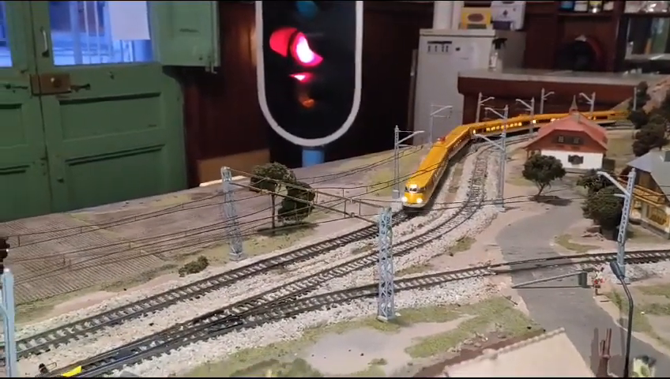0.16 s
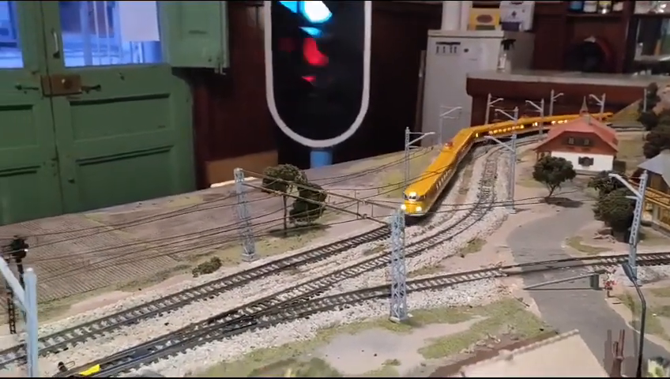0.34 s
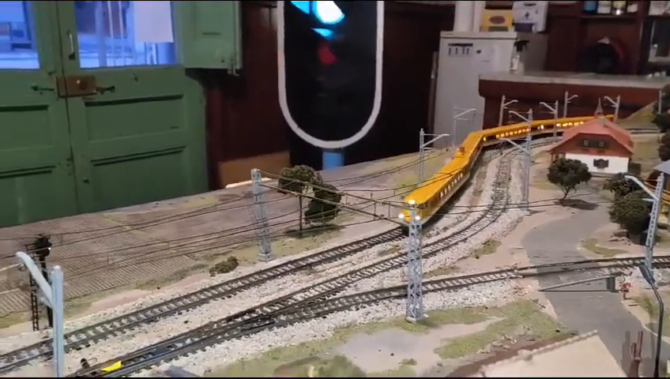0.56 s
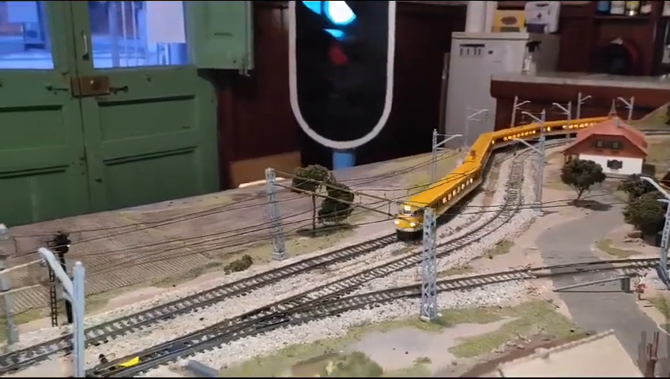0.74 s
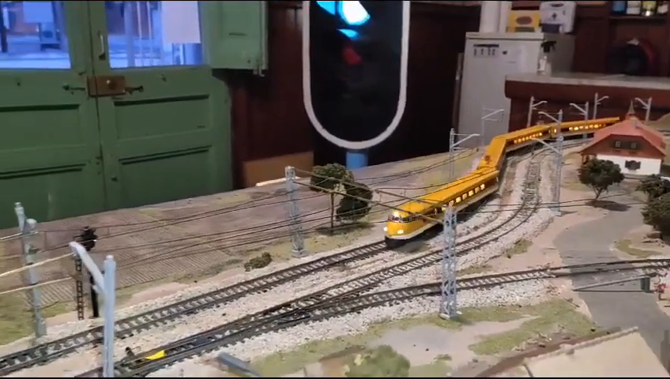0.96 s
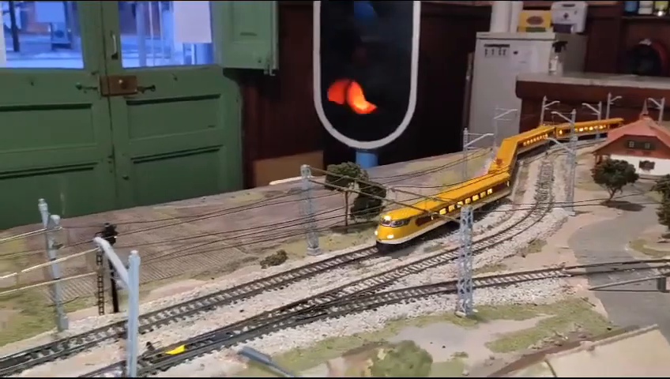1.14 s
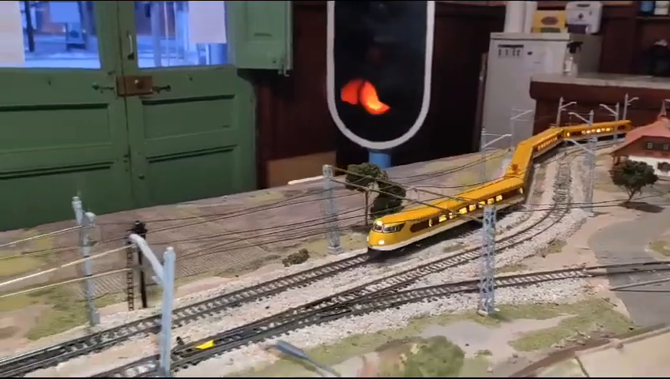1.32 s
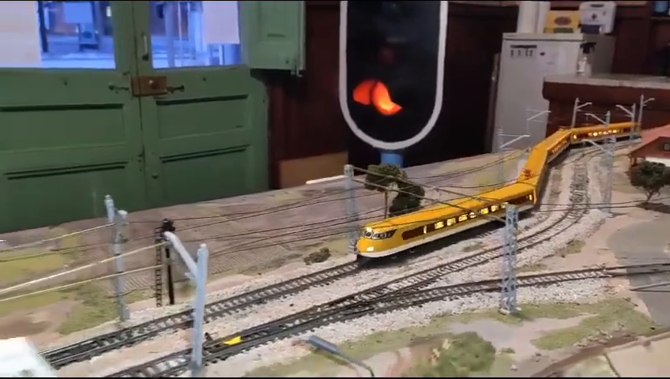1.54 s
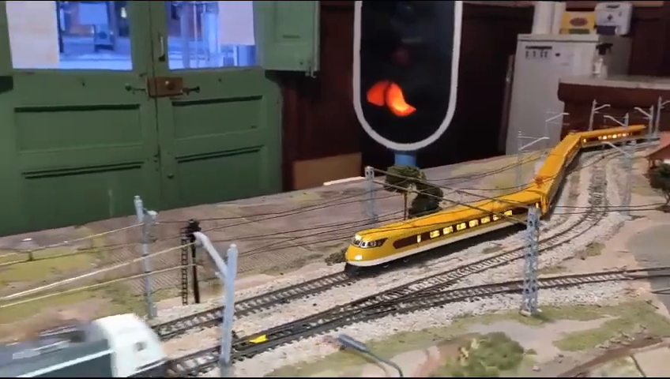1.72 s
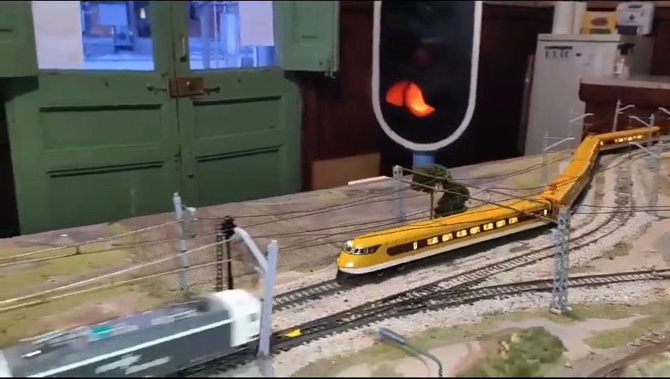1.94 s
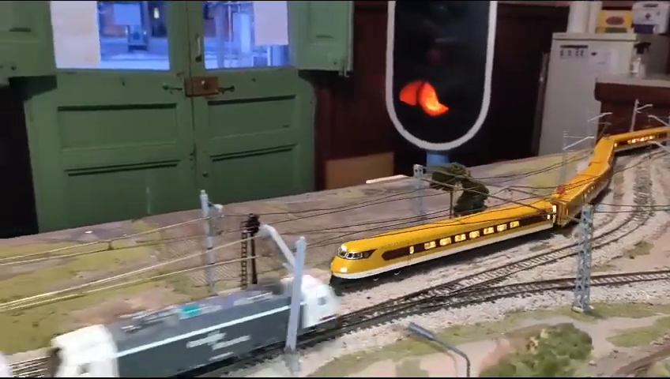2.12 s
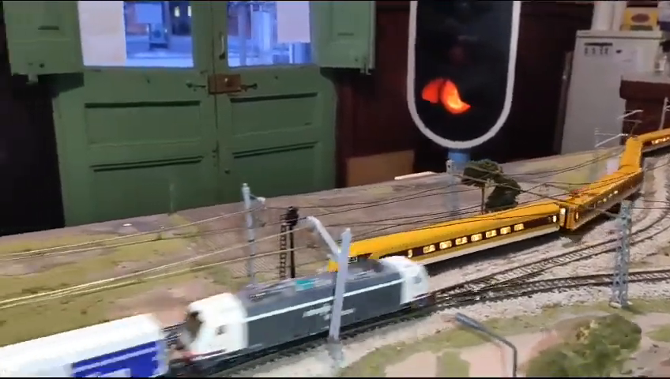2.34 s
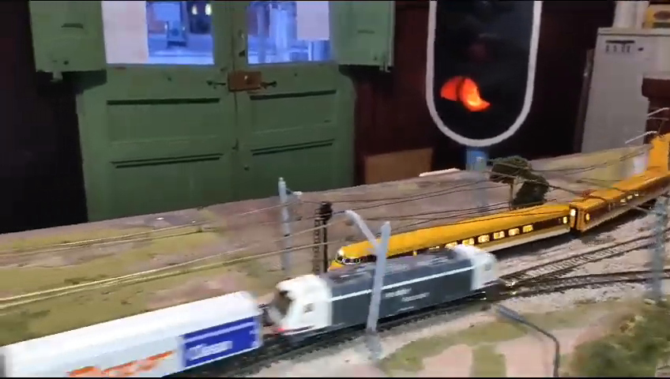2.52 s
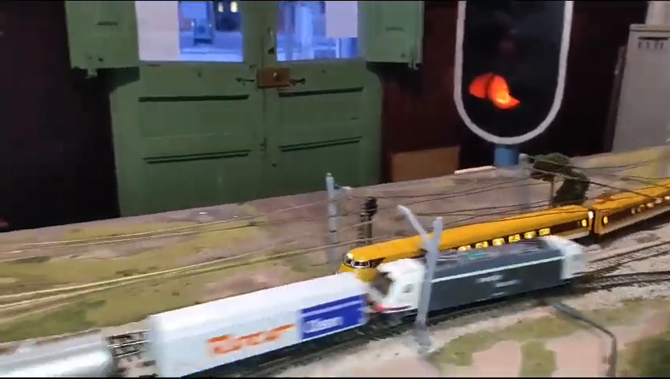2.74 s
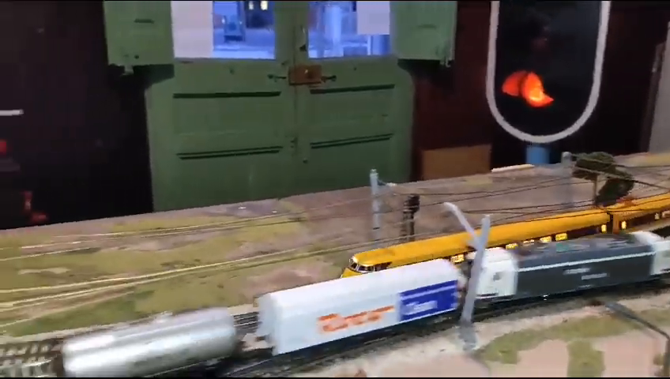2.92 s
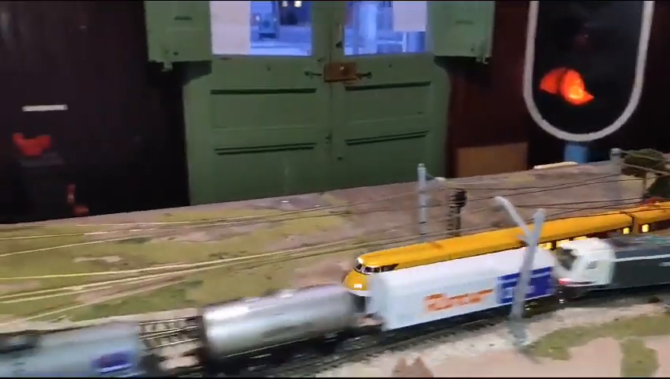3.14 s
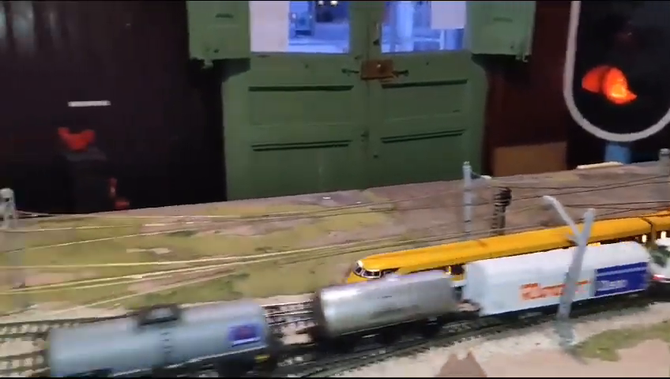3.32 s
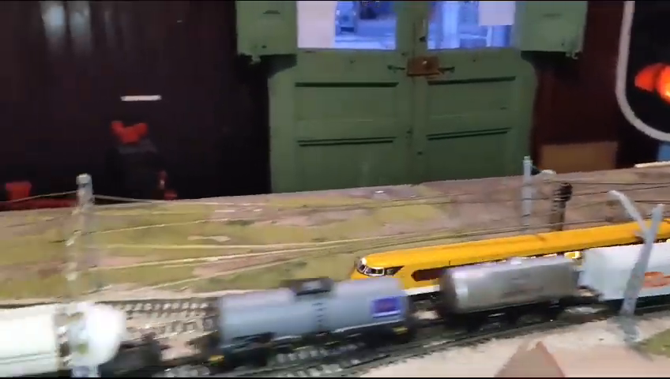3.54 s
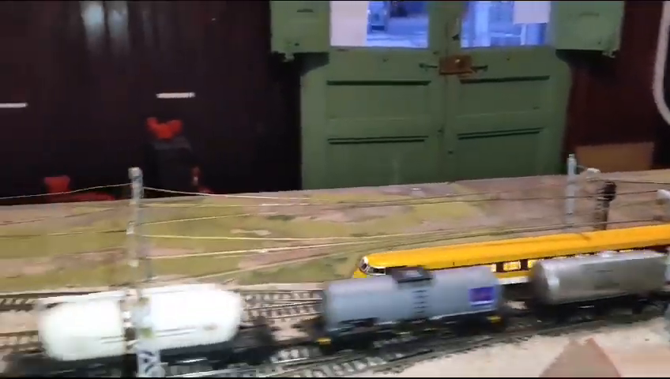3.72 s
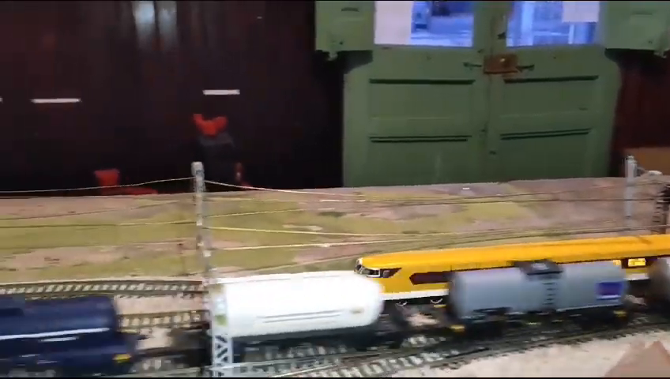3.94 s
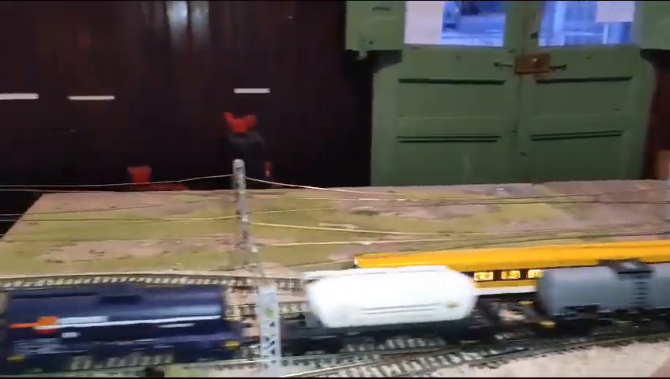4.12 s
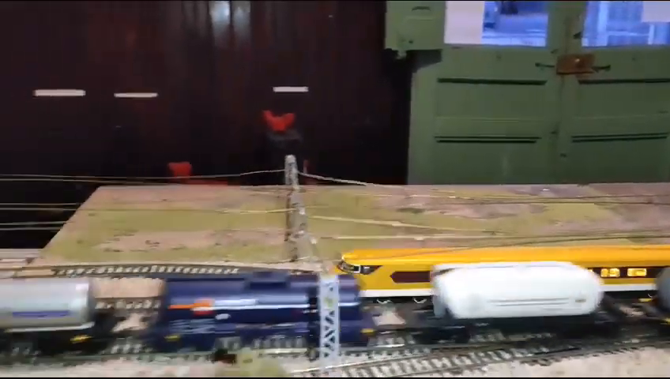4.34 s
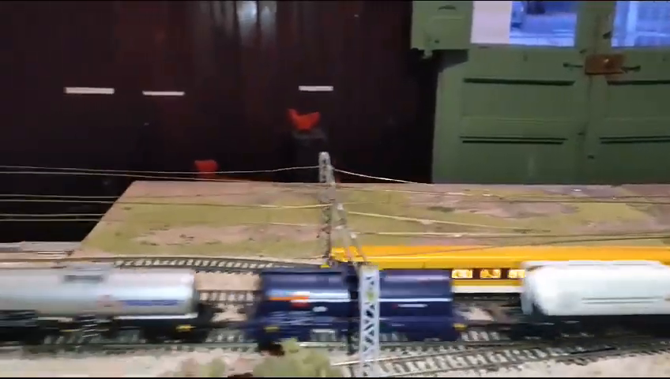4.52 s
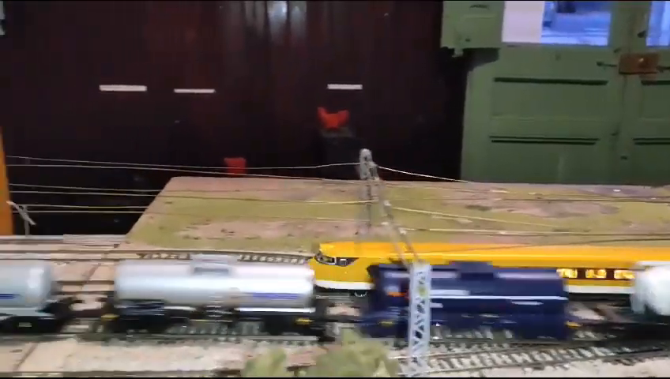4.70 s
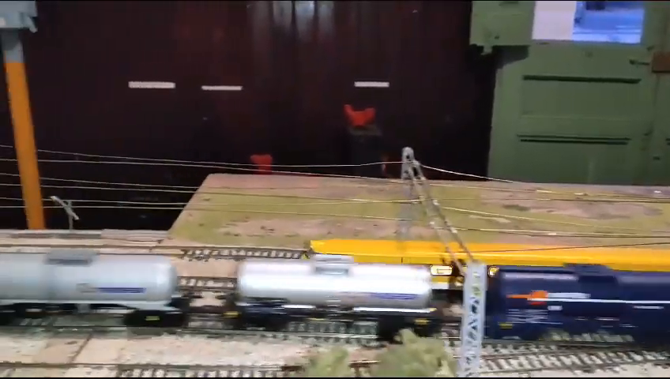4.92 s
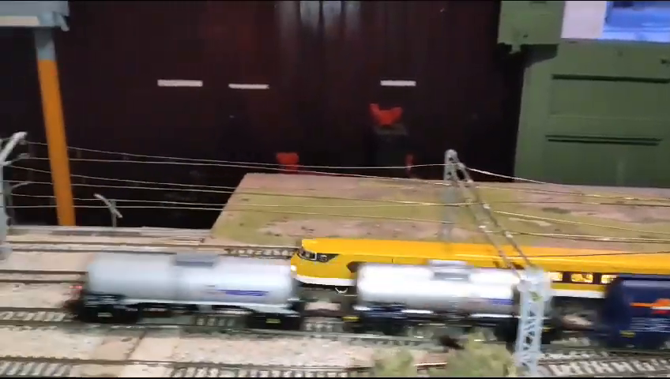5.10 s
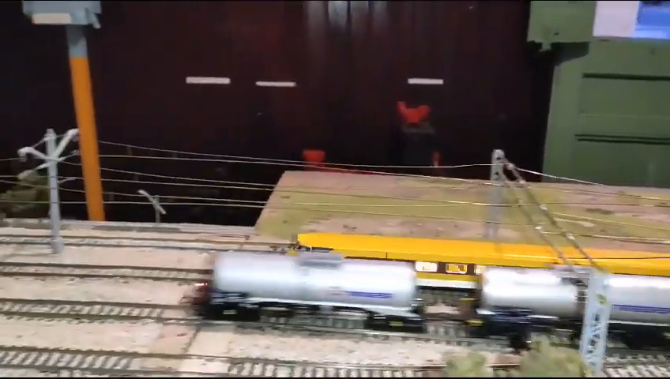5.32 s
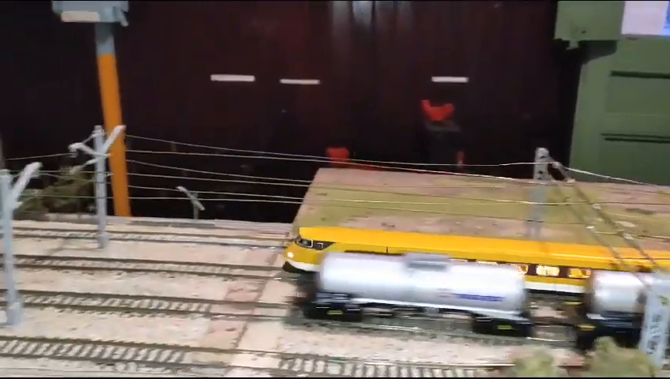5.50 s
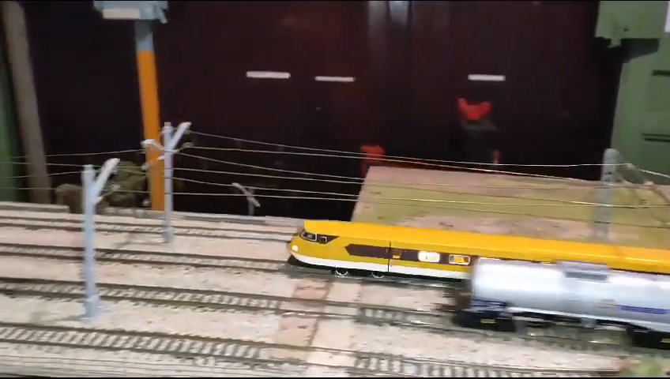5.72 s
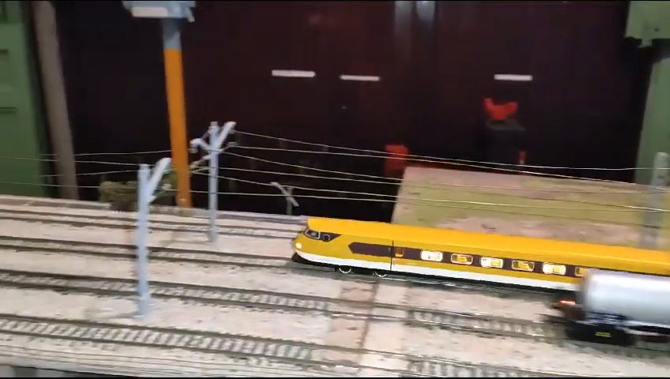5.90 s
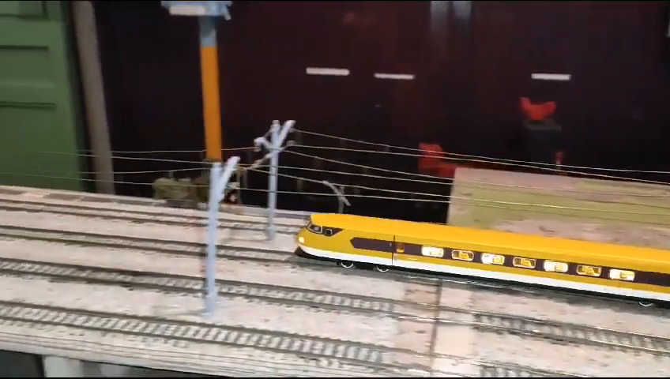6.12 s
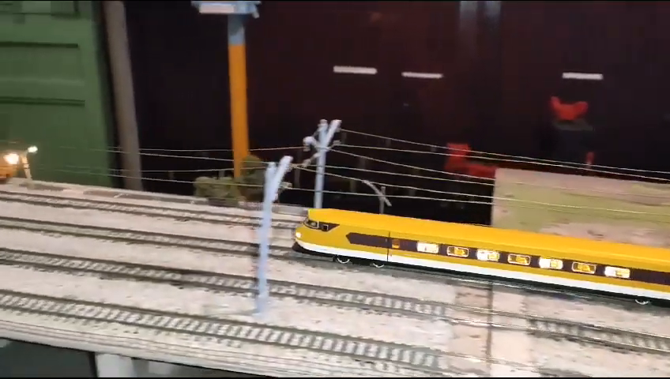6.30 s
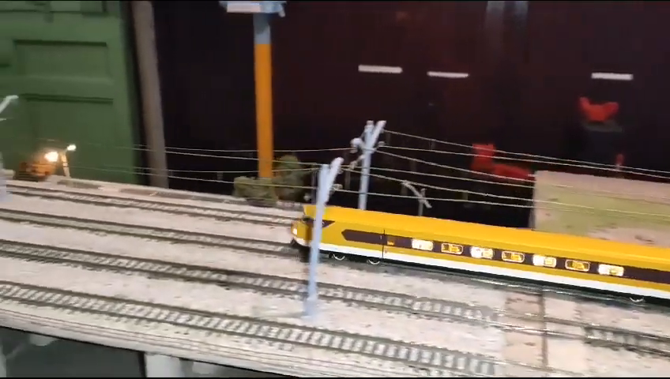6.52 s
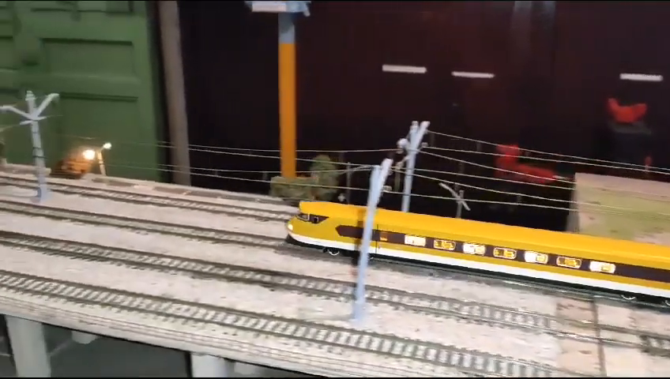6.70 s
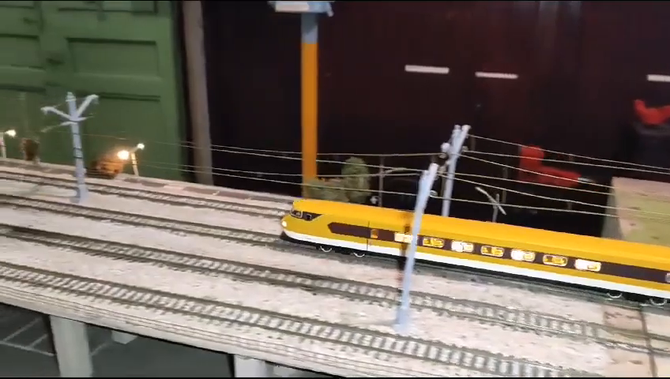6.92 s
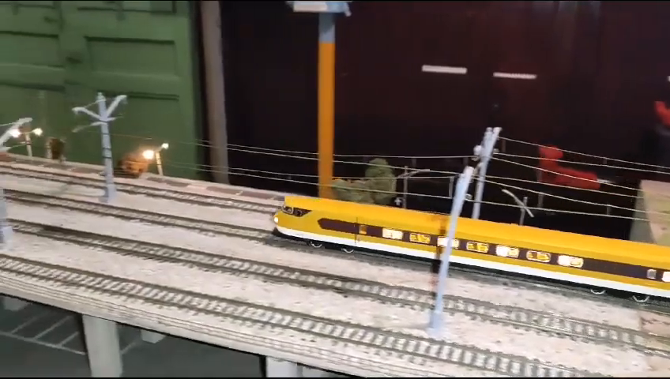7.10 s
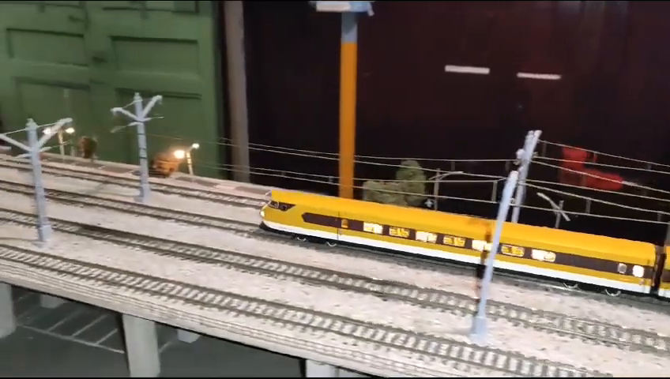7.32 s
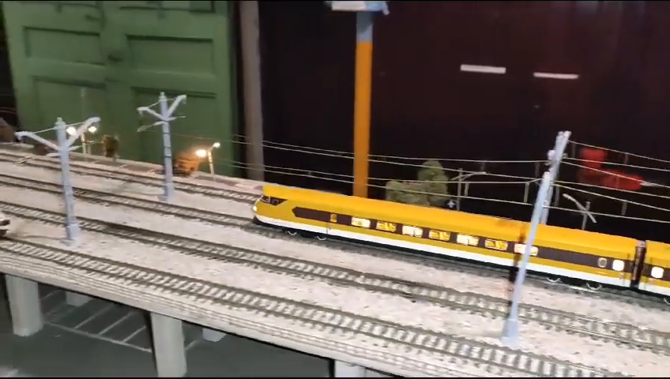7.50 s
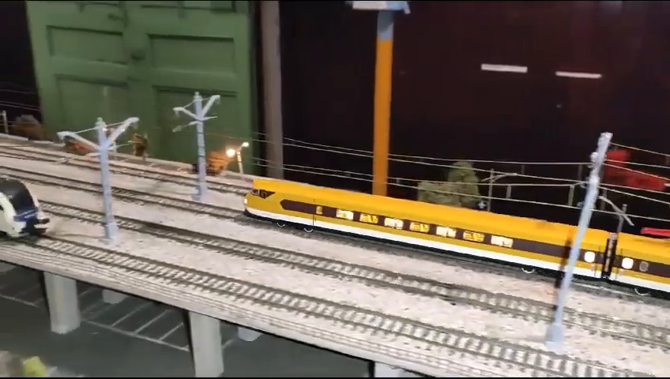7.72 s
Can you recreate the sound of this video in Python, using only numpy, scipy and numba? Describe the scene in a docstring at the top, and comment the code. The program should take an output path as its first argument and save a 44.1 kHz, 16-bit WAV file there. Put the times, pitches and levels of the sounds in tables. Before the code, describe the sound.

Two model electric trains pass on a wooden layout, heard close through a phone. Gear buzz and a dull distant drone come first, with small rail-joint clicks. Then the nearer goods train builds to a dense, bright metallic rattle with crisp clacks, tiny pings and a low tabletop rumble. After its last wagon the level falls sharply, leaving the railcar rolling on in the slightly echoing hall.

```python
"""A model railway club layout in a hall, heard close up from its edge through a phone microphone.
At first a railcar rolls steadily, gears buzz, and a goods train drones dully on the far side of the layout.
The goods train swells, its locomotive hums past at 3.5 s and its wagons clack over the points close by.
After 6 s its tail is soon gone and the railcar is left. Rough wheel treads make the roar, rattle and ring;
blows at joints make the clicks; the baseboard booms below, and shaft and gears supply the tones."""
import sys
import numpy as np
from scipy import signal
from scipy.fft import rfft, irfft
from scipy.io import wavfile
from numba import njit

SR = 44100
rng = np.random.default_rng(int(sys.argv[2]) if len(sys.argv) > 2 else 0)


def pcm_store(signal):
    """Save signal as 16-bit PCM."""
    levels = np.round(np.clip(np.atleast_2d(signal), -1, 1) * 32767)
    wavfile.write(sys.argv[1], SR, levels.astype(np.int16).T)


N = 341775  # 7.75 s
TIME = np.arange(N) / SR

# Colours of the plastic bodies, the rattling bogies and the ringing wheels: pitch_hz, level_db (per Hz)
ROAR_COLOUR = [(150, -22), (300, -10), (450, -13), (620, -9.5), (800, -8), (1050, -5), (1700, 0),
               (2000, -2), (2400, -2), (2800, -7), (3600, -11), (6000, -30), (16000, -74.5)]
RATTLE_COLOUR = [(1200, -30.5), (2400, -6.5), (3000, 1.5), (3900, 4), (5000, 2), (6200, -5), (7600, -7),
                 (9000, -5), (11000, -49), (16000, -73)]
RING_COLOUR = [(4000, -31.5), (7000, -2), (8500, 3.5), (9200, 4.5), (9850, 8), (10400, 1), (11200, -5),
               (12000, -19), (13000, -45.5)]
# Ringing pitch of the nearest wagon's shell, used as far as the goods train is close: start_s, pitch_hz
WAGON_SHELL_PITCH = [(2.0, 1850), (3.0, 1780), (3.9, 1650), (4.7, 1594), (5.3, 1820), (5.8, 2130)]
RAILCAR_SHELL_HZ, RAILCAR_HOLLOW_HZ = 1650, 787
SHELL_NEAR_DB, SHELL_FAR_DB = -2.5, -11.5  # over the roar, goods train abreast and away
HOLLOW_DB = -55.5  # the railcar's hollow body, before the roar is rescaled
HOLLOW_HELD_DB = -6  # added to it until the goods train has gone by


def rolling(roar_db, rattle_db, ring_db):
    """Tread roughness shakes the bodies, rattles the bogies and rings the wheels; the load on them wavers."""
    load = walk(24)
    near = closeness()
    shell_hz = RAILCAR_SHELL_HZ + (curves(WAGON_SHELL_PITCH)[0] - RAILCAR_SHELL_HZ) * near
    shell_db = SHELL_FAR_DB + (SHELL_NEAR_DB - SHELL_FAR_DB) * near ** 4
    hollow_db = HOLLOW_DB - roar_db + HOLLOW_HELD_DB * abreast(0, 0)

    # ticks stand out of the hiss only when the wheels are close
    ticks = specks(rate=110, spread_db=10.5) * unit(undb(0.58 * rattle_db))
    force = bumps(rate=5000, spread_db=2.5) + 0.5 * ticks
    shell = unit(resonate(bumps(rate=600, spread_db=1.0), shell_hz, 270.0))
    hollow_hz = np.full(N, float(RAILCAR_HOLLOW_HZ))
    hollow = unit(resonate(bumps(rate=2500, spread_db=2.0), hollow_hz, 145.0))
    bodies = unit(colour(force, ROAR_COLOUR)) + undb(shell_db) * shell + undb(hollow_db) * hollow
    roar = unit(bodies) * undb(roar_db + 0.5 + 0.44 * load + 0.74 * walk(130))

    hiss = rng.standard_normal(N)
    rattle = unit(colour(0.85 * ticks + hiss, RATTLE_COLOUR)) * undb(rattle_db - 1.93 + 0.45 * load)
    scrape = rng.standard_normal(N) * undb(0.59 * walk(170))
    ring = unit(colour(0.96 * ticks + scrape, RING_COLOUR)) * undb(ring_db - 1.2 + 0.95 * load)
    return roar + rattle + ring


def bumps(rate, spread_db):
    """Tiny impacts of rough treads on the rail: mostly weak, a few stronger; rate is per second."""
    hit = rng.random(N) < rate / SR
    strength = np.minimum(rng.exponential(size=N), 3.8)
    sign = np.sign(rng.standard_normal(N))
    return unit(hit * sign * undb(spread_db * strength))


def specks(rate, spread_db):
    """Grit and small flaws under the many wheels: each tick scrapes for a moment and rings at its own pitch."""
    out, size = np.zeros(N), 512
    t = np.arange(size) / SR
    for when, strength, pitch, length in rng.random((int(rate * N / SR), 4)):
        scrape = rng.standard_normal(size) * np.exp(-t / (0.0011 + 0.0043 * length))
        ring = resonate(scrape, np.full(size, 2500 + 8300 * pitch), 620.0)
        tick = unit(scrape) + 0.5 * unit(ring)
        add(out, when * N / SR, tick * undb(spread_db * strength ** 2))
    return unit(out)


# Rolling parts before trims and brief changes:
# railcar_db, goods_abreast_db, reached_s, rise_db_per_s (until then)
ROAR_PASS = (-47, -41.5, 2.5, 1.5)
RATTLE_PASS = (-50.5, -43, 4, 4)
RING_PASS = (-55.5, -49.5, 2.5, 6.5)
RUMBLE_PASS = (-59, -52, 3, 4.5)
LAST_WAGON_S, LEAVE_DB_PER_S = 5.99, 27.5


def abreast(reached_s, rise_db_per_s):
    """Gain of the goods train: it swells, holds while the wagons pass, and drops behind the last one."""
    rise_db = -rise_db_per_s * np.maximum(reached_s - TIME, 0)
    leave_db = -LEAVE_DB_PER_S * np.maximum(TIME - LAST_WAGON_S, 0)
    return undb(rise_db + leave_db)


def closeness():
    """How close the goods train is, from 0 to 1, following the rise and fall of its roar."""
    return abreast(*ROAR_PASS[2:])


def both_trains(railcar_db, goods_db, reached_s, rise_db_per_s):
    """Level in dB of the steady railcar and the passing goods train, their powers added."""
    goods = undb(goods_db) * abreast(reached_s, rise_db_per_s)
    return 20 * np.log10(np.hypot(undb(railcar_db), goods))


# Brief changes in the level of the rolling sound and of the low rumble: peak_s, width_s, roar_db, board_db
LEVEL_CHANGES = [(1.154, 0.54, 1.0, 7), (1.733, 0.22, 0.5, 5), (5.048, 0.14, 1, 3.5),
                 (6.092, 0.11, -0.3, 0.5), (6.58, 0.23, 3, 6), (6.94, 0.24, 3, 4.5), (7.65, 0.96, 3, 6)]


def level_changes():
    """Brief smooth changes, in dB, of the rolling sound and of the low rumble."""
    total = np.zeros((2, N))
    for s, width_s, roar_db, board_db in LEVEL_CHANGES:
        shape = np.exp(-(2 * (TIME - s) / width_s) ** 2)
        total += np.outer([roar_db, board_db], shape)
    return total


# Bogies striking joints and points, levels before trims:
# start_s, clack_level_db, clack_pitch_hz, ring_level_db, ring_pitch_hz, knock_level_db
JOINT_BLOWS = [(0.0868, -41.5, 5200, -40, 8950, -44), (0.4438, -40, 3050, -35.5, 10100, -50),
               (0.717, -39, 3000, -46, 9400, -46.5), (0.7229, -31, 3470, -35, 9400, -34),
               (0.7372, -36, 3620, -46, 8450, -53), (0.8591, -36.5, 3270, -39.5, 8000, -37),
               (1.1207, -38.5, 3980, -41, 11000, -32), (1.1598, -43, 6450, -35.5, 10200, -38.5),
               (1.2366, -44, 3000, -45, 9500, -33.5), (1.2533, -39.5, 3350, -42, 9900, -43),
               (1.977, -43, 4080, -46, 9950, -35), (2.0784, -40, 2950, -39, 9500, -33.5),
               (2.183, -36, 2900, -37.5, 8500, -40), (2.4121, -40, 3530, -52, 9400, -33.5),
               (2.5832, -35.5, 3300, -42, 8600, -49), (2.7209, -33, 3420, -37.0, 9150, -30.5),
               (2.9887, -37, 2950, -36.5, 9700, -38), (3.1854, -41, 4800, -38, 9600, -43),
               (3.2519, -29.5, 4450, -32.5, 9250, -36), (3.3859, -35, 4840, -32.5, 9250, -35),
               (3.4303, -33, 4850, -36, 8950, -35), (3.6523, -35, 3940, -38.5, 9900, -41.0),
               (3.7477, -42, 3250, -34.5, 10200, -41), (3.786, -34.5, 4080, -47, 10150, -35),
               (3.8813, -39.5, 6300, -36, 8200, -39), (3.9082, -35, 4250, -40, 9550, -33.5),
               (3.9485, -49.5, 5650, -33, 10100, -31.5), (4.1926, -35.5, 4250, -39, 9250, -37),
               (4.4533, -42, 4500, -36, 10200, -46), (4.483, -26.5, 5150, -36, 10200, -47),
               (4.6282, -26.5, 4340, -30.5, 9400, -37), (4.6499, -33, 4250, -33, 9900, -34),
               (4.7701, -27.5, 4740, -32.5, 9300, -34), (4.7803, -39, 3900, -34, 9900, -35),
               (4.795, -36, 4430, -34, 9400, -51), (4.9391, -32.5, 4300, -30.5, 9300, -50),
               (4.9552, -37, 4800, -43, 9500, -46), (5.104, -35.5, 3530, -40, 7960, -43),
               (5.117, -36.0, 3800, -48, 9650, -46.5), (5.1871, -36, 3750, -31, 9600, -34),
               (5.2854, -31.5, 4180, -36, 9500, -52), (5.5807, -33.5, 2950, -41, 10750, -44),
               (5.6303, -37, 4050, -39.5, 9300, -36), (5.6768, -38, 3150, -43, 8250, -40),
               (5.696, -34, 5100, -44, 9850, -49), (5.7296, -37, 3850, -34.5, 9400, -35),
               (5.8726, -33, 4100, -44.0, 9060, -45.0), (5.8865, -37, 4190, -41, 9400, -34.5),
               (5.9414, -43, 4680, -34.5, 9400, -34), (6.169, -39.5, 5850, -46, 9450, -44.5),
               (6.395, -42, 3930, -43, 9500, -49), (6.4984, -40.5, 3950, -42, 8400, -46),
               (6.531, -33.5, 5800, -37, 9400, -44), (6.7887, -42.5, 3150, -41.5, 8880, -58),
               (6.8215, -30.5, 3740, -39, 9850, -34), (6.96, -32, 3800, -36, 8500, -34.5),
               (7.2422, -43, 4400, -38.5, 9700, -38.5), (7.3445, -33, 4140, -43, 8050, -42),
               (7.3844, -45, 4700, -38, 9700, -38), (7.673, -35.5, 4500, -48, 9450, -50)]
# The clearest flanges nicking the rail, level before its trim: start_s, level_db
FLANGE_PINGS = [(1.3013, -34.5), (1.3154, -35), (1.4473, -33.5), (1.6893, -34), (1.7898, -31),
                (2.2272, -32.5), (2.43, -34.5), (4.05, -26.5), (4.39, -27.5), (4.4927, -26.5)]
# The heaviest jolts of couplings and plastic bodies, level before its trim: start_s, level_db, pitch_hz
COUPLING_JOLTS = [(1.1058, -37, 1590), (1.291, -36, 1670), (1.5887, -34, 1285), (2.064, -33, 1750),
                  (2.1627, -32.5, 1707), (2.383, -37, 1695), (2.511, -34, 1753), (2.765, -34, 1080),
                  (2.8975, -33, 1755), (3.027, -36, 1650), (3.935, -35, 1950), (5.428, -35.5, 1706),
                  (5.546, -35, 1700), (5.747, -33.5, 1300)]
# Colour of a flange's ping on the rail: pitch_hz, level_db (per Hz)
PING_COLOUR = [(4000, -25), (7500, -9), (9000, -16), (9900, 7.5), (11200, -6), (13000, -24), (15000, -42)]
PING_TRIM_DB, JOLT_TRIM_DB = -6, -1
# lighter blows by chance: rate per s, top level_db before the effect of closeness, range_db
SMALL_CLACKS, SMALL_PINGS, SMALL_JOLTS = (17, -39.5, 9), (8.7, -43, 21), (5.5, -38.5, 5.4)
BOGIE_RANGE_HZ, WHEEL_RANGE_HZ = (3000, 6200), (8300, 10300)  # pitches of the light clacks
WAGONS_ON_POINTS_S = (3.2, 5.3)
HEAVY_CLACK_DB = -31  # wagon clacks above this table level are followed by the bogie's second axle
AXLE_LAG_S, AXLE_DB = 0.0436, -7.5


def impacts():
    """Axles cross the joints; flanges ping, bogies tick and couplings jolt in between."""
    out = np.zeros(N)
    first_s, last_s = WAGONS_ON_POINTS_S
    for s, *drop in JOINT_BLOWS:
        wagon = first_s < s < last_s
        add(out, s, wheel_drop(*drop, bogie=WAGON_CLACK_COLOUR if wagon else CLACK_COLOUR))
        if wagon and drop[0] > HEAVY_CLACK_DB:
            second_axle = wheel_drop(*drop, bogie=WAGON_CLACK_COLOUR)
            add(out, s + AXLE_LAG_S, second_axle * undb(AXLE_DB))
    for s, db, hz in COUPLING_JOLTS:
        jolt = strike(KNOCK_COLOUR, hz, *BODY_MODE, BODY_DECAY_S)
        add(out, s, jolt * undb(db + JOLT_TRIM_DB))
    for s, db in by_chance(*SMALL_CLACKS):
        clack_hz, ring_hz = rng.uniform(*BOGIE_RANGE_HZ), rng.uniform(*WHEEL_RANGE_HZ)
        add(out, s, wheel_drop(db, clack_hz, db - 3.5, ring_hz, db - 1.5, bogie=CLACK_COLOUR))
    clear_pings = [(s, db + PING_TRIM_DB) for s, db in FLANGE_PINGS]
    for s, db in clear_pings + by_chance(*SMALL_PINGS):
        add(out, s, blow(PING_COLOUR, chatter=0.33, decay_s=0.0041) * undb(db))
    for s, db in by_chance(*SMALL_JOLTS):
        add(out, s, blow(KNOCK_COLOUR, chatter=0.17, decay_s=0.0049) * undb(db))
    return out


def by_chance(rate, top_db, range_db):
    """Random rows of start_s and level_db, louder while the goods train is close."""
    near = closeness()
    rows = []
    for when, weak in rng.random((256, 2))[:int(rate * N / SR)]:
        near_db = 20 * np.log10(0.035 + near[int(when * N)] ** 3)
        rows.append((when * N / SR, top_db - range_db * weak + near_db))
    return rows


# Colours of a struck bogie, a goods wagon's bogie on the points, a struck wheel and a knocked body:
# pitch_hz, level_db (per Hz)
CLACK_COLOUR = [(1200, -23), (2300, -8.5), (3200, 1.5), (5200, -3), (7200, -5.5), (9000, -10), (15000, -52)]
WAGON_CLACK_COLOUR = [(1200, -29), (3100, -6), (3800, -1), (5600, -1.5), (6200, -8.5), (7100, -5.5),
                      (8200, -10), (15000, -41)]
WHEEL_COLOUR = [(5500, -17), (7800, -3), (10000, -1.5), (11200, -9), (12500, -21), (15000, -52)]
KNOCK_COLOUR = [(200, -12), (1200, 6), (1700, 5), (3000, 2), (16000, -37)]
# ringing of a struck part: width_hz, level_db over its broad colour
CLACK_MODE, WHEEL_MODE, BODY_MODE = (720, -3.5), (520, -1), (340, -2)
METAL_DECAY_S, BODY_DECAY_S = 0.0014, 0.003  # scraping after a blow on metal and on a plastic body
CLACK_TRIM_DB, RING_TRIM_DB, KNOCK_TRIM_DB = -1, -0.5, -1


def wheel_drop(clack_db, clack_hz, ring_db, ring_hz, knock_db, bogie):
    """One wheel drops into a gap: the bogie clacks, the wheel rings, the body knocks."""
    clack = strike(bogie, clack_hz, *CLACK_MODE, METAL_DECAY_S) * undb(clack_db + CLACK_TRIM_DB)
    ring = strike(WHEEL_COLOUR, ring_hz, *WHEEL_MODE, METAL_DECAY_S) * undb(ring_db + RING_TRIM_DB)
    knock = strike(KNOCK_COLOUR, RAILCAR_SHELL_HZ, *BODY_MODE, BODY_DECAY_S) * undb(knock_db + KNOCK_TRIM_DB)
    return clack + ring + knock


DROP_S, SCRAPE = 0.0008, 0.33  # a wheel's fall into the gap; size of the scrape against the snap


def strike(points, hz, width_hz, mode_db, decay_s, size=1024):
    """A contact scrapes, snaps and settles, ringing a part at its own pitch; rms 1 when averaged over 5 ms."""
    t = np.arange(size) / SR
    contact = np.minimum(t / DROP_S, 1) ** 2 * np.exp(-np.maximum(t - DROP_S, 0) / decay_s)
    snap = np.arange(size) == int(DROP_S * SR)
    broad = colour(snap + SCRAPE * contact * rng.standard_normal(size), points)
    mode = resonate(broad, np.full(size, float(hz)), float(width_hz))
    return unit_blow(unit(broad) + undb(mode_db) * unit(mode))


def blow(points, chatter, decay_s, size=2048):
    """A sharp contact and a brief chatter ring a part; rms 1 when averaged over 5 ms."""
    t = np.arange(size) / SR
    force = (t == 0) + chatter * rng.standard_normal(size) * np.exp(-t / decay_s)
    return unit_blow(colour(force, points))


def unit_blow(sound):
    """Scale a blow so that its energy spread over 5 ms has rms 1."""
    return sound / np.linalg.norm(sound) * np.sqrt(SR / 200)


# Colour of the wooden baseboard: pitch_hz, level_db (per Hz)
RUMBLE_COLOUR = [(20, -12), (40, -3.5), (52, 2), (72, -3), (98, 2), (120, -2.5), (170, -1), (210, -5.5),
                 (265, -14.5), (350, -14.5), (430, -24.5), (800, -60)]
BOOM_GOODS_HZ, BOOM_RAILCAR_HZ = 148.7, 89


def baseboard():
    """The wooden table booms under the wheels, higher under the goods train than under the railcar."""
    level_db = both_trains(*RUMBLE_PASS)
    boom_hz = BOOM_RAILCAR_HZ + (BOOM_GOODS_HZ - BOOM_RAILCAR_HZ) * closeness() ** 2
    boom = unit(resonate(bumps(rate=1500, spread_db=0.5), boom_hz, 20.0))
    rumble = unit(colour(bumps(rate=2500, spread_db=2.0), RUMBLE_COLOUR))
    return unit(rumble + 0.47 * boom) * undb(level_db + 1.0 * walk(14))


# Brief low throbs of the table and the motor: peak_s, pitch_hz, level_db
LOW_THROBS = [(0.77, 65, -57), (0.97, 237, -56), (2.48, 116.3, -54), (2.72, 109.8, -54),
              (2.95, 171.7, -50.5), (3.6, 120, -49), (5.04, 149, -49), (5.96, 100.2, -52), (6.58, 104, -59)]
THROB_S = 0.13  # half the length of a throb


def low_throbs():
    """Brief low tones of the table and the motor, each swelling and fading at its own wavering pitch."""
    out = np.zeros(N)
    for s, hz, db in LOW_THROBS:
        tone = np.sin(2 * np.pi * hz * TIME + 0.5 * walk(25))
        throb = undb(db + 3.4 * walk(30)) * np.exp(-((TIME - s) / THROB_S) ** 2)
        out += tone * throb
    return out


# Speed of the motor shaft: start_s, pitch_hz (turns per s)
SHAFT_SPEED = [(0, 114), (0.9, 122), (1.6, 116), (2.8, 115), (3.6, 116)]
# Gear tones: order (multiple of the shaft rate), level_db (relative)
GEAR_TONES = [(2, 1), (2.42, -7), (3, -13.5), (4, -7), (6.1, -3.5)]
# Level of the gear buzz: start_s, level_db
BUZZ_LEVEL = [(0, -58), (0.9, -57), (2.6, -60.5), (3.5, -59), (4.2, -69), (6.5, -67)]
# the locomotive passes, the time it takes to travel its closest distance, and its hum there
LOCO_S, LOCO_NEAR_S, HUM_DB = 3.5, 0.98, -56
SHAFT_WOBBLE = 0.02  # fraction of the speed


def motor():
    """An unbalanced shaft hums, loudest as the locomotive passes; its gears buzz and fade once it has gone by."""
    distance_db = -10 * np.log10(1 + ((TIME - LOCO_S) / LOCO_NEAR_S) ** 2)
    turns_per_s = curves(SHAFT_SPEED)[0] * (1 + SHAFT_WOBBLE * walk(25))
    phase = 2 * np.pi * np.cumsum(turns_per_s) / SR
    hum = np.sin(phase) * undb(2.4 * walk(15))
    gears = sum(undb(db + 4.0 * walk(14)) * np.sin(order * phase) for order, db in GEAR_TONES)
    return unit(hum) * undb(HUM_DB + distance_db) + unit(gears) * undb(curves(BUZZ_LEVEL)[0])


# Colour of far wheels heard only as a dull drone through the hall: pitch_hz, level_db (per Hz)
DRONE_COLOUR = [(120, -17), (240, 6), (330, -3), (450, 6), (600, 2.5), (1200, -39.5)]
DRONE_START_DB, DRONE_FADE_DB_PER_S = -58.5, 5.5


def drone():
    """The goods train on the far side of the layout, fading as it comes round to the front."""
    far_wheels = unit(colour(rng.standard_normal(N), DRONE_COLOUR))
    return far_wheels * undb(DRONE_START_DB - DRONE_FADE_DB_PER_S * TIME + 2.2 * walk(6.8))


HALL_T60_S = 0.73


def hall(x, wet_db, damp_hz):
    """Diffuse echo of the hall, duller than the direct sound."""
    t = np.arange(SR) / SR
    tail = rng.standard_normal(SR) * undb(-60 * t / HALL_T60_S) * (1 - np.exp(-t / 0.00047))
    damping = signal.butter(1, min(damp_hz, SR / 3), fs=SR, output="sos")
    tail = signal.sosfilt(damping, tail / np.linalg.norm(tail))
    return x + undb(wet_db) * signal.fftconvolve(x, tail)[:N]


def undb(db):
    """Decibels to gain."""
    return 10 ** (np.asarray(db) / 20)


def unit(x):
    """Scale to rms 1."""
    return x / np.sqrt(np.mean(x ** 2))


def curves(table):
    """The columns of a timed table, one value a sample."""
    s, *columns = np.transpose(table)
    return [np.interp(TIME, s, c) for c in columns]


def walk(rate):
    """Slow random wavering of rms 1, through a fresh value this many times per second."""
    steps = rng.standard_normal(2048)
    return unit(np.interp(TIME * rate, np.arange(len(steps)), steps))


def response(points, size=4096):
    """Causal impulse response with the given colour and energy 1."""
    hz, db = np.transpose(points)
    f = np.maximum(np.fft.rfftfreq(size, 1 / SR), 1)
    gain = undb(np.interp(np.log(f), np.log(hz), db))
    # folding the cepstrum onto positive time gives minimum phase
    cepstrum = irfft(np.log(gain))
    cepstrum[1:size // 2] *= 2
    cepstrum[size // 2 + 1:] = 0
    h = irfft(np.exp(rfft(cepstrum)))
    return h / np.linalg.norm(h)


def colour(x, points):
    """Pass a force through a body with the given colour."""
    return signal.fftconvolve(x, response(points))[:len(x)]


@njit
def resonate(x, hz, width):
    """Band-pass (state-variable filter) whose centre may move every sample; hz and width in Hz."""
    y, band, low = np.empty(len(x)), 0., 0.
    for i in range(len(x)):
        g, k = np.tan(np.pi * hz[i] / SR), width / hz[i]
        v = (band + g * (x[i] - low)) / (1 + g * (g + k))
        band, low, y[i] = 2 * v - band, low + 2 * g * v, k * v
    return y


def add(out, s, sound):
    """Mix a sound in at a time."""
    part = out[max(int(s * SR), 0):][:len(sound)]
    part += sound[:len(part)]


def scene():
    """Wheels, joints, table and motor, heard from the edge of the layout."""
    roar_change_db, board_change_db = level_changes()
    levels_db = [both_trains(*part) + roar_change_db for part in (ROAR_PASS, RATTLE_PASS, RING_PASS)]
    wheels = hall(rolling(*levels_db), wet_db=-9, damp_hz=2980)
    clicks = hall(impacts(), wet_db=-5, damp_hz=4480)
    rumble = baseboard() * undb(board_change_db)
    return (wheels + clicks + rumble + low_throbs() + motor() + drone())[None]


def record(dry):
    """The phone cuts the top, steeply above 15.4 kHz."""
    return signal.sosfilt(signal.ellip(8, 0.2, 70, 15400, fs=SR, output="sos"), dry)


dry = scene()
out = record(dry)
pcm_store(out)
```